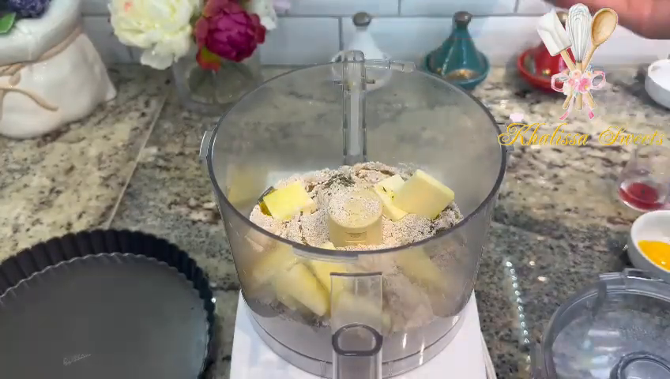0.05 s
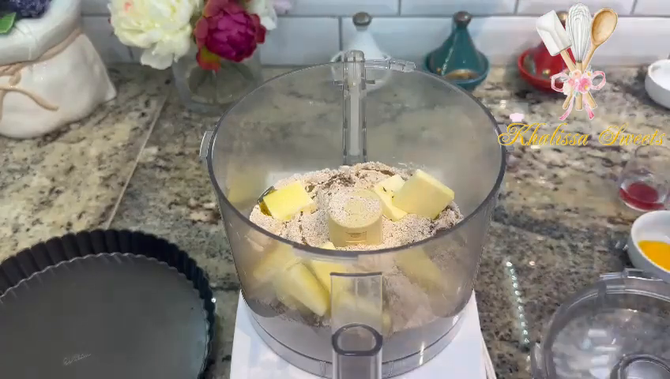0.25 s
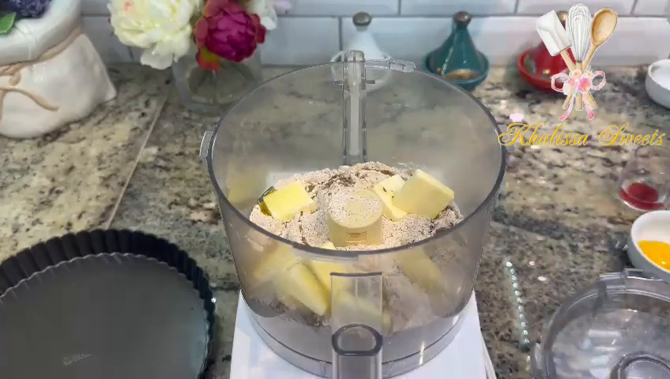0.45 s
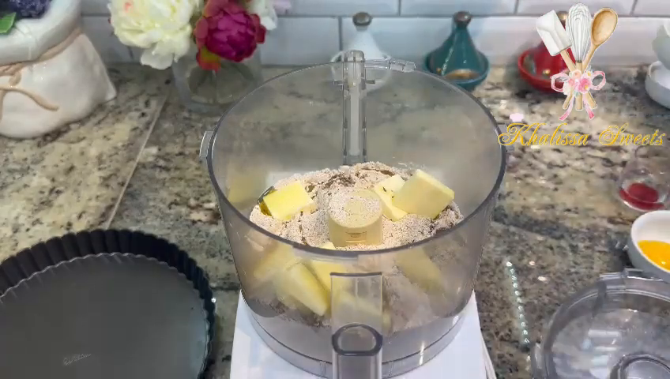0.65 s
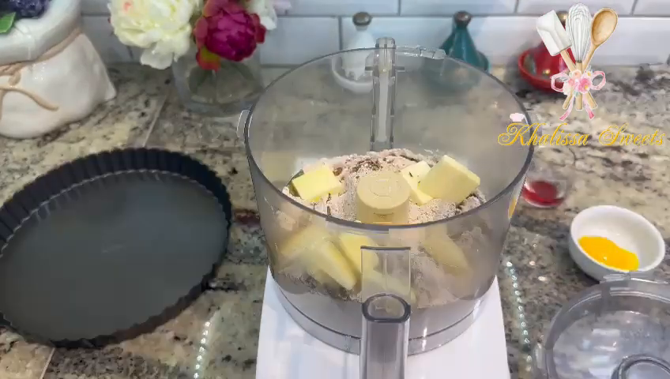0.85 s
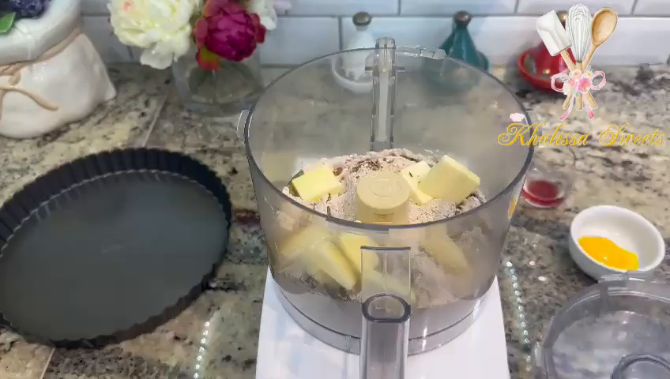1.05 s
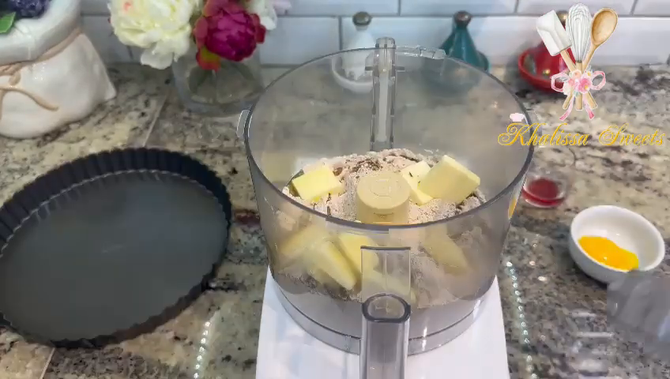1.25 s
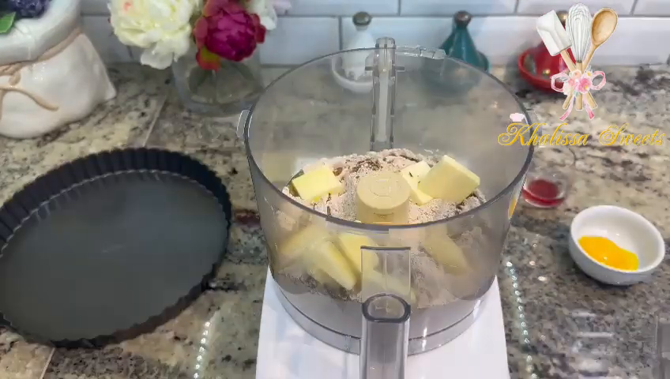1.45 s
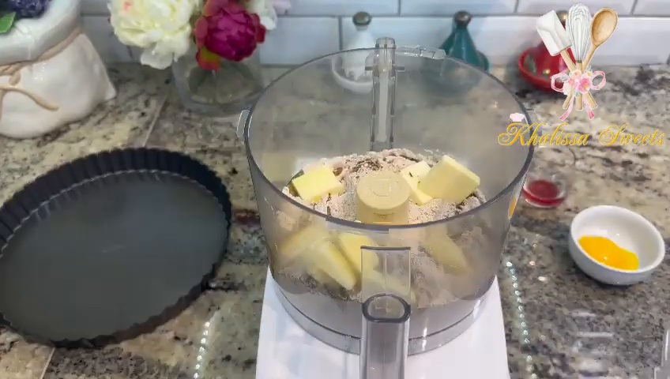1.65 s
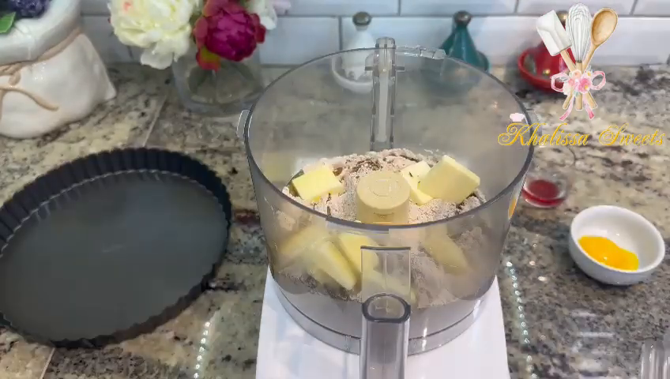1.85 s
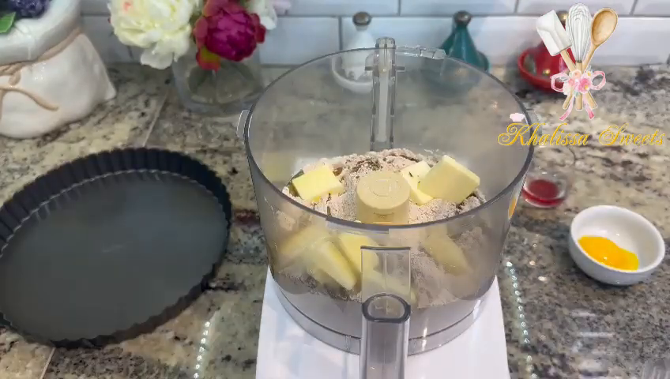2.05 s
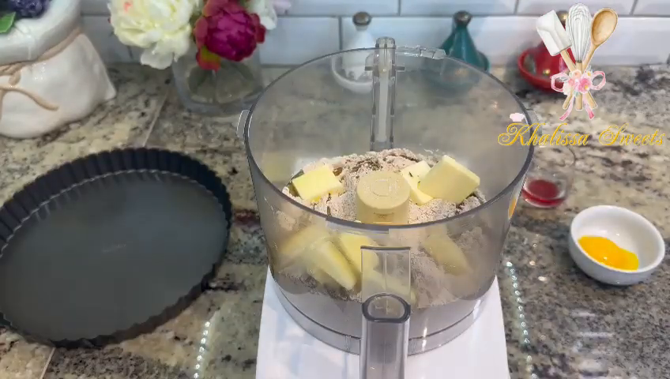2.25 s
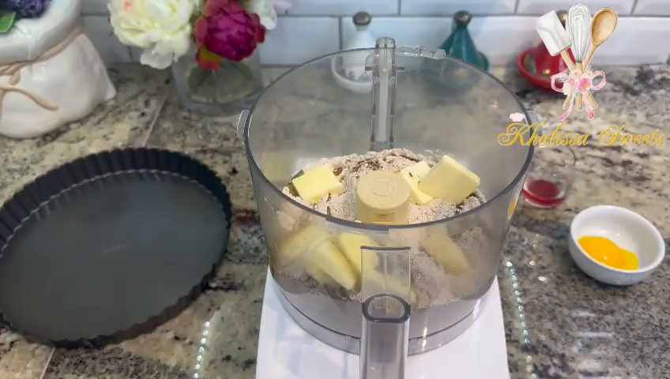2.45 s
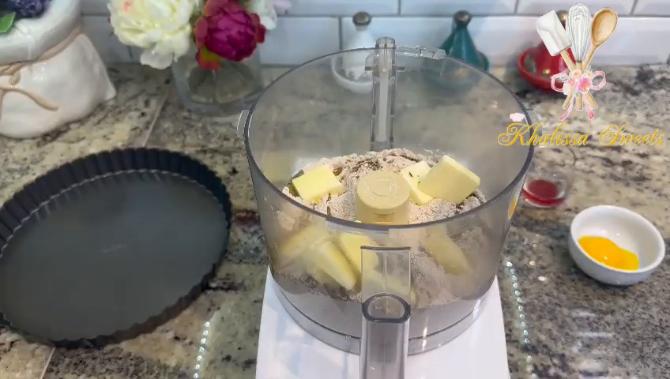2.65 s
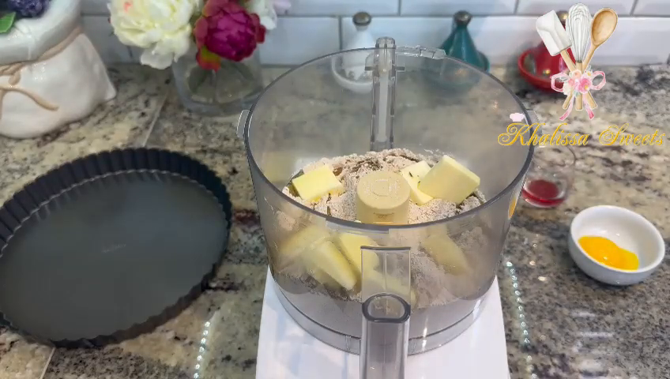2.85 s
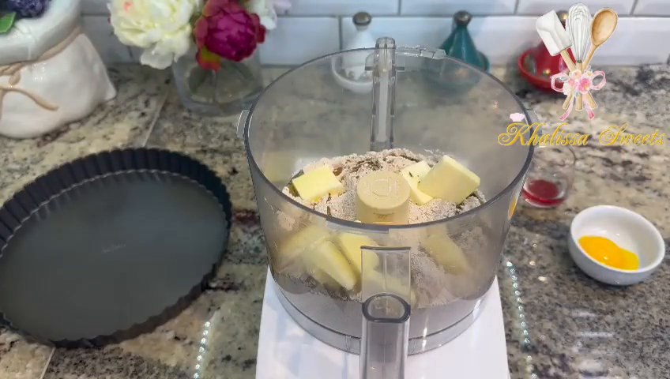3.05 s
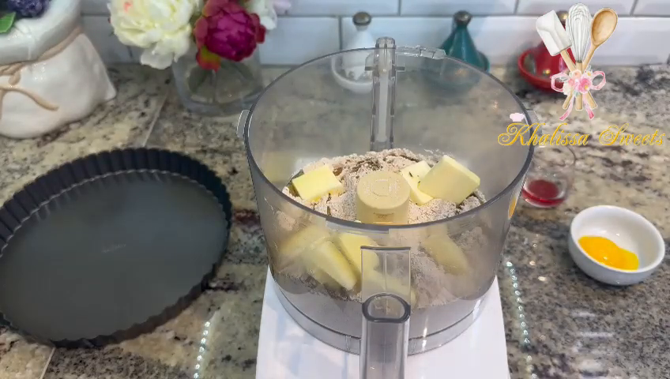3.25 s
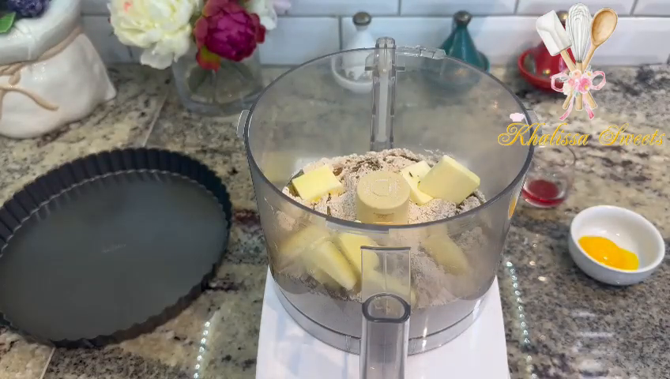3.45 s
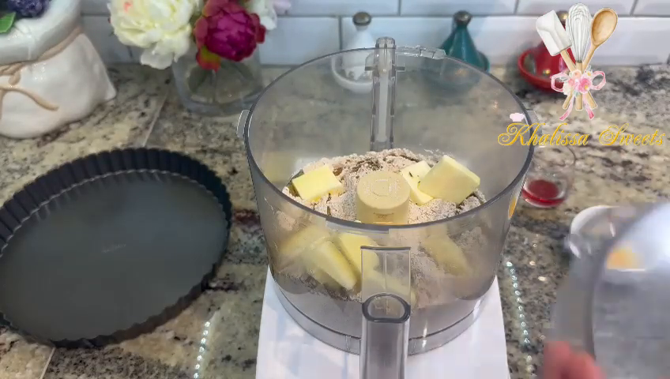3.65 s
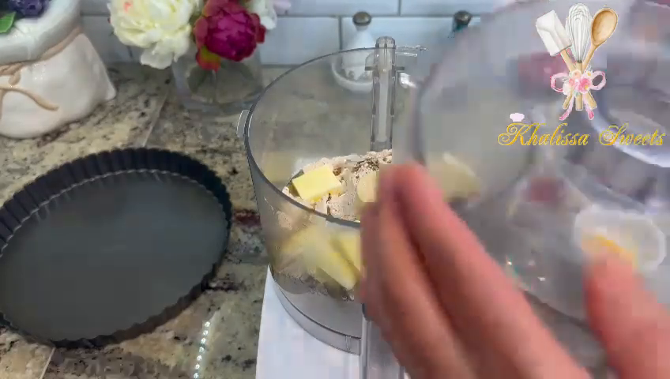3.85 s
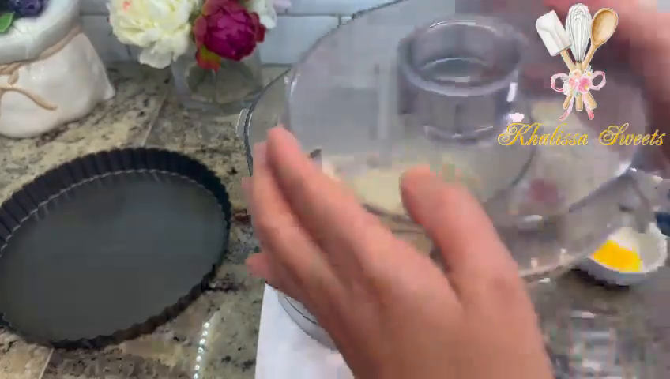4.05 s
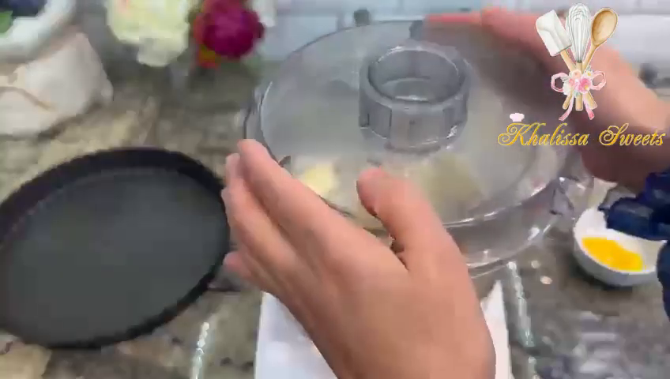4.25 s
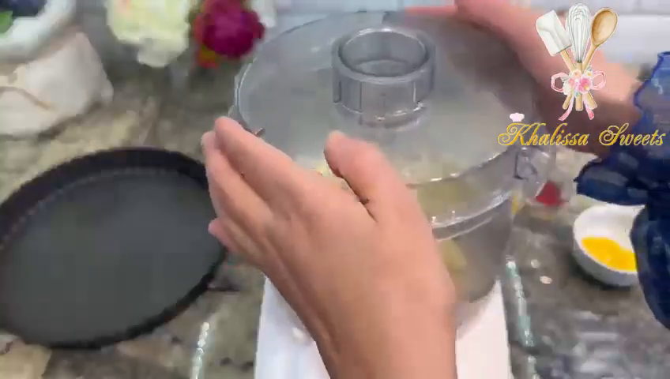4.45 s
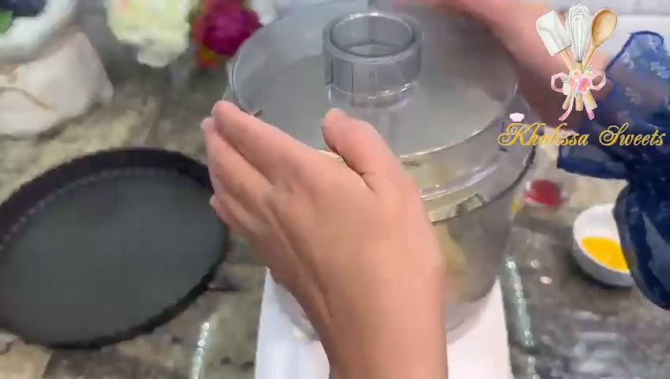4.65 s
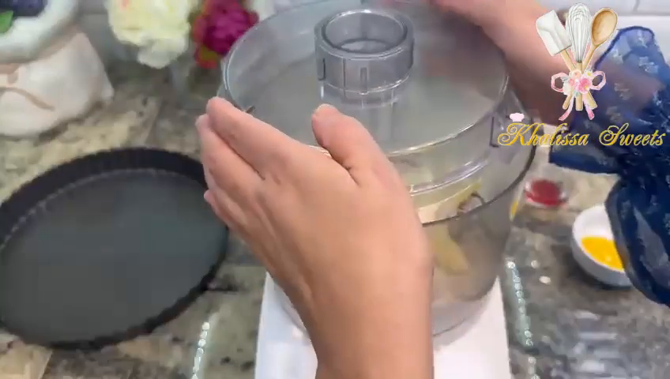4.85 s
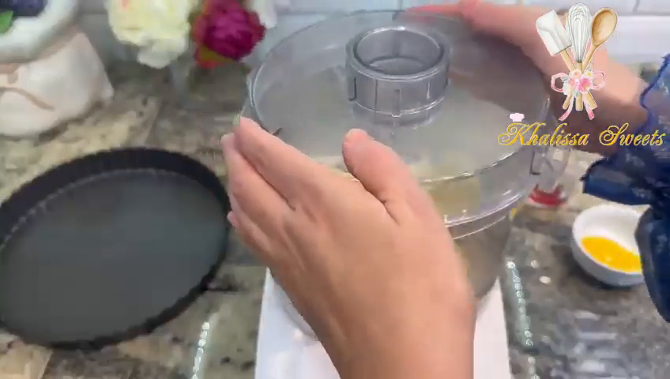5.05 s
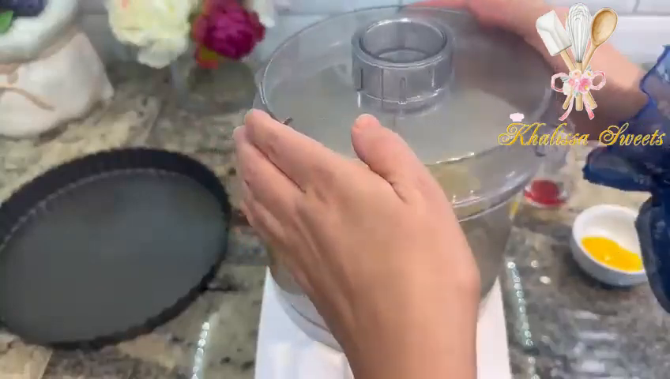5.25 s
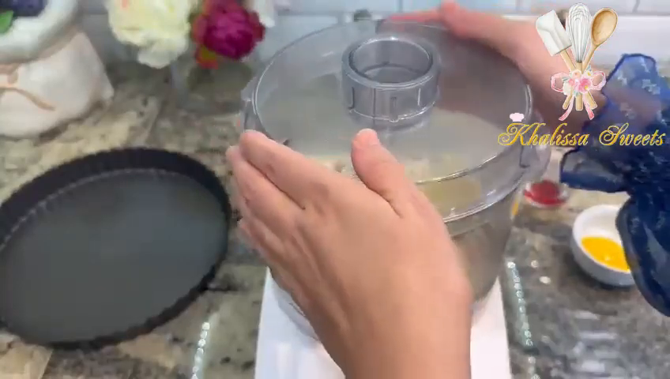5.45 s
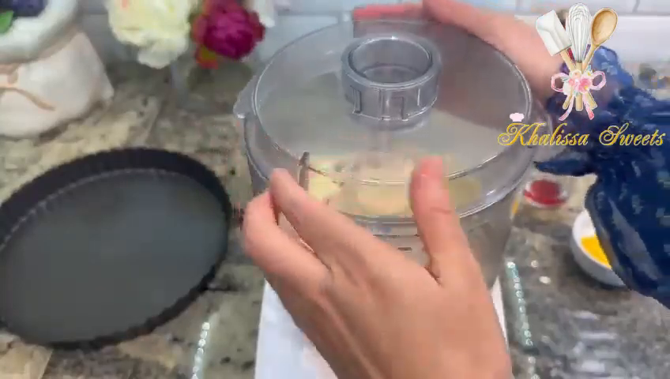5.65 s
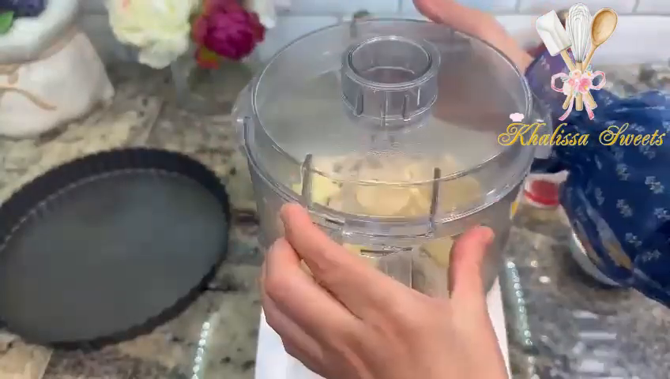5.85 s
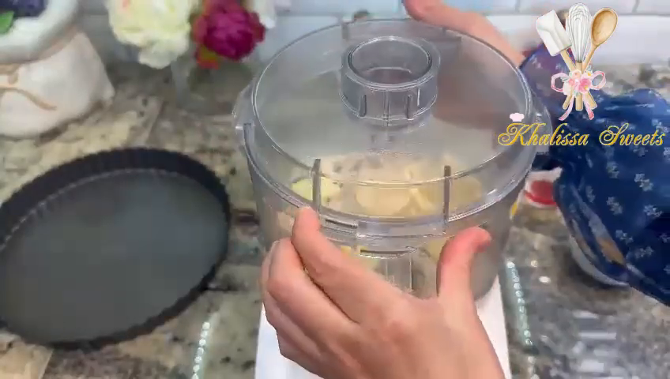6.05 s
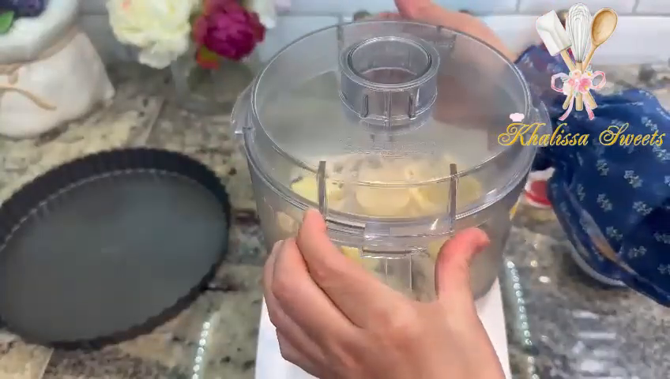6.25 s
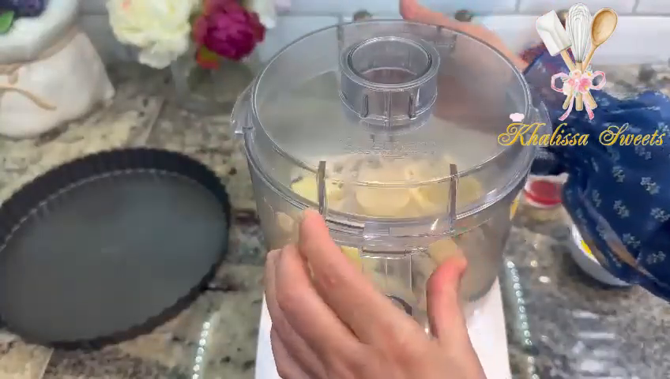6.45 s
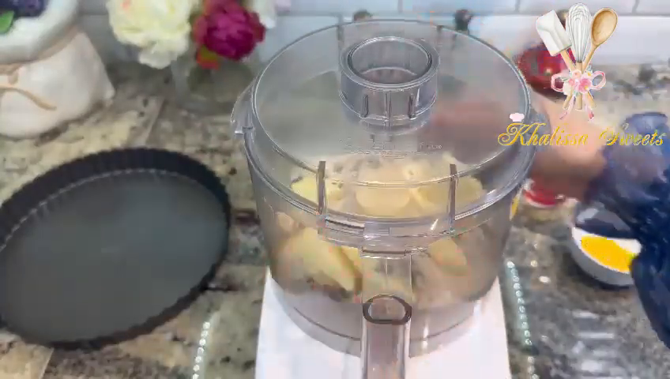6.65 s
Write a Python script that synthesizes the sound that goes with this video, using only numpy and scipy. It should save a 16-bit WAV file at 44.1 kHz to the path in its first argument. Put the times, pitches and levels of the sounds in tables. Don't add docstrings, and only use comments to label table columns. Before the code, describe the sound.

Over quiet kitchen hum, a thin plastic lid lifts from a stone counter with damped taps while sleeves and fingers rustle. After a near-quiet pause it clacks onto a plastic bowl with a hollow boom, scrapes and creaks by stick-slip, then snaps in a tight cluster. A lighter bright click leads into a hard locking clunk and small settling knocks. Close stereo pickup, short tiled-room reflections.

```python
import sys
import numpy as np
from scipy import signal
from scipy.fft import rfft, irfft
from scipy.io import wavfile
from scipy.ndimage import uniform_filter1d

SR = 44100
rng = np.random.default_rng(int(sys.argv[2]) if len(sys.argv) > 2 else 0)


def invert_db(x):
    u = np.asarray(x, float) / 20
    return 10 ** u


def master_out(mix):
    frames = np.transpose(np.atleast_2d(mix))
    ceiling = np.clip(frames, -1, 1)
    pcm = np.round(ceiling * 32767).astype(np.int16)
    wavfile.write(sys.argv[1], SR, pcm)


N = 295955

# pitch_hz, level_db (per Hz)
WALL_MODES = [(350, -27), (600, -9.5), (720, -7.5), (850, -7.5), (1600, -10), (2200, -11.5), (2700, -16),
              (3100, -23), (5000, -67)]
# pitch_hz, level_db (per Hz)
RIM_MODES = [(1800, -17.5), (2600, -5), (3400, -1.5), (4500, -7), (5200, -9), (6600, -10.5), (7150, -15),
             (9000, -12), (10200, -20), (12000, -28)]
# time_s, pitch_hz
GAP_PITCH = [(4.2, 492), (4.4, 437), (4.6, 330), (4.75, 370), (5.0, 340), (5.2, 393), (5.4, 320),
             (5.75, 241), (6.71, 290)]
HELD_PAN_DB, BOWL_PAN_DB, AIR_PAN_DB = -9, -2, -1.5
HELD_CUT, BOWL_CUT = 0.33, 0.09


def evened(x):
    return x / np.sqrt(np.mean(x ** 2) + 1e-20)


def read(points, hz):
    f, value = np.transpose(points)
    return np.interp(np.log(hz + 1), np.log(f + 1), value)


def add(mix, start_s, sound, pan_db, lag=8.):
    for side, heard, sign in zip(mix, sound * np.ones((2, 1)), (1, -1)):
        first = round(start_s * SR + sign * (lag - pan_db) / 2)
        part = side[first:][:len(heard)]
        part += invert_db(sign * pan_db / 2) * heard[:len(part)]


def resonate(x, hz, width_hz):
    turn = np.exp(2j * np.pi * np.cumsum(hz * np.ones(len(x))) / SR)
    pole = np.exp(-np.pi * width_hz / SR)
    return 2 * (turn * signal.lfilter([1 - pole], [1, -pole], x / turn)).real


def ring(x, modes):
    t = np.arange(6000) / SR
    response = sum(invert_db(db - 60 * t / t60) * np.sin(2 * np.pi * hz * t) for hz, db, t60 in modes)
    return signal.oaconvolve(x, response)


def dense(colour, t60, shared, blow=(1,)):
    both, left, right = rng.standard_normal((3, 4096))
    mixed = np.array([left, right]) * np.sqrt(1 - shared ** 2) + shared * both
    shaped = irfft(rfft(mixed) * invert_db(read(colour, np.fft.rfftfreq(4096, 1 / SR))))
    t = np.arange(4096) / SR
    decay = invert_db(-60 * t / t60) * (1 - np.exp(-t / 0.00014))
    first_instant = 1 + 3.5 * np.exp(-t / 0.0095)
    energy = np.convolve(np.square(blow), (decay * first_instant) ** 2)
    return evened(shaped) * np.sqrt(energy[:4096])


def hiss(colour, same, patchy_db, size):
    hop = size // 4
    frames, hz = N // hop + 5, np.fft.rfftfreq(size, 1 / SR)
    a, b, c, d, patches = rng.standard_normal((frames, len(hz), 5)).T
    patches = uniform_filter1d(patches, size // 64, 0)
    patches = evened(uniform_filter1d(patches, 4096 // hop, 1))
    same = np.clip(read(same, hz), -1, 1)[:, None]
    left = a + 1j * b
    right = same * left + np.sqrt(1 - same ** 2) * (c + 1j * d)
    z = np.array([left, right]) * invert_db(read(colour, hz)[:, None] + patchy_db * patches)
    return evened(signal.istft(z, nperseg=size, noverlap=size - hop)[1][:, :N])


def slips(count, per_s, spread_db):
    size = invert_db(spread_db * np.minimum(rng.exponential(1, count), 4))
    return size * rng.choice([-1, 1], count) * (rng.random(count) < per_s / SR)


def stroke(t, full_s, held_s, db, rise_db_per_s, fall_db_per_s):
    before_s = np.maximum(full_s - t, 0)
    after_s = np.maximum(t - full_s - held_s, 0)
    return invert_db(db - rise_db_per_s * before_s - fall_db_per_s * after_s)


def hum():
    # pitch_hz, level_db (per Hz)
    air_colour = [(12, -45), (20, -6.5), (49, 0.5), (135, -17.5), (191, -11.5), (213, -13), (455, -16.5),
                  (500, -25), (1200, -31), (1370, -25), (1740, -32.5), (2210, -36), (2660, -36.5),
                  (9270, -44), (11500, -50.5), (14900, -84), (22000, -120)]
    # pitch_hz, likeness
    air_same = [(60, 0.92), (170, 0.37), (480, 0.083), (1370, -0.21), (3880, 0.22), (11000, -0.22)]
    # pitch_hz, width_hz, level_db
    drone_bands = [(41, 22.6, -69.5), (60.1, 13, -75.5), (193.5, 24, -78)]
    # time_s, level_db
    whine_level = [(0, -82.5), (.9, -80.5), (1.3, -108), (6.71, -104.5)]

    def fuzzy(hz, width_1_hz, width_2_hz):
        noise = rng.standard_normal(N)
        return evened(resonate(resonate(noise, hz, width_1_hz), hz, width_2_hz))

    whine = [fuzzy(1370, 220, 300) for _ in range(2)]
    whine_db = np.interp(np.arange(N) / SR, *np.transpose(whine_level))
    drones = sum(invert_db(db) * fuzzy(hz, width, width) for hz, width, db in drone_bands)
    air = invert_db(-64) * hiss(air_colour, air_same, patchy_db=2.1, size=2048)
    return air + drones + invert_db(whine_db) * whine


def rustle():
    # full_s, held_s, rustle_db, dull_share_db, brightest_hz
    moves = [(1.05, 0.096, -75.5, 6, 4360), (1.275, 0.14, -77.5, 4, 5250), (1.5, 0.094, -88, 10, 4100),
             (1.59, .11, -76, 1.5, 4700), (1.74, 0.1, -79, -1.5, 4300), (1.95, 0.53, -77.5, 3.5, 4070),
             (2.13, 0.074, -81, 2, 4600), (2.29, 0.013, -76, -12, 3870), (2.37, 0.088, -74, 5.5, 3960),
             (2.57, 0.18, -68.5, 3, 4200), (2.85, 0.017, -81, -3, 4170), (2.95, 0.24, -89, 5, 4260),
             (3.12, 0.36, -93.5, 5, 4340), (3.27, 0.033, -92.5, 12, 4300), (3.56, 0.07, -75, -2, 4150),
             (3.61, 0.087, -77.5, 9.5, 3800), (3.77, 0.73, -88, 7, 4040)]
    # full_s, level_db
    hold_shifts = [(1.14, -57), (1.39, -68), (1.66, -72), (2.02, -68), (2.15, -75), (2.593, -58),
                   (2.72, -64), (2.9, -66), (3.15, -65.5), (3.27, -69), (3.361, -71.5), (3.45, -73),
                   (3.62, -68), (3.92, -68.5), (4.08, -62.5)]
    # pitch_hz, level_db (per Hz)
    rub_colour = [(290, -57), (500, -3.5), (682, -8), (1100, -2.5), (2200, -1), (2940, -7), (3200, -13),
                  (4160, -53), (7040, -120)]
    weave_colour = [(1760, -8.5), (3000, -8), (3250, -6), (3990, -5), (5110, -8.5), (5880, -6.5),
                    (6760, -9.5), (9060, -1), (10200, -8), (11700, -15), (14900, -72), (22000, -120)]
    thump_colour = [(20, -20), (45, 6.5), (90, 0.5), (200, 2), (450, -1), (700, -10), (950, -37.5)]
    stir_db_per_s, settle_db_per_s, thump_db_per_s, thump_rest_db = 426, 317.5, 161, -82.5
    t = np.arange(N) / SR
    bright, dull = sum(stroke(t, s, held, db, stir_db_per_s, settle_db_per_s) * invert_db([[0], [dull_db]])
                       for s, held, db, dull_db, _ in moves)
    brightest_hz = np.interp(t, *np.transpose(moves)[::4])
    shift = sum(stroke(t, s, 0, db, thump_db_per_s, thump_db_per_s) for s, db in hold_shifts)
    first_s = moves[0][0]
    shift += stroke(t, first_s, GAP_PITCH[0][0] - first_s, thump_rest_db, stir_db_per_s, settle_db_per_s)
    catch = invert_db(1.17 * evened(uniform_filter1d(rng.standard_normal(N), 300)))

    apart = [(200, 0.84), (500, 0.08), (1500, 0.1)]  # pitch_hz, left-right likeness
    rub = hiss(rub_colour, apart, patchy_db=4.0, size=512)
    weave = hiss(weave_colour, apart, patchy_db=2.5, size=512)
    weave = evened(weave + 2.35 * np.array([resonate(side, brightest_hz, 1500) for side in weave]))
    whisk = stroke(t, 1.296, 0.073, 3.3, stir_db_per_s, settle_db_per_s)
    weave = weave + whisk * np.array([resonate(side, 5400, 830) for side in weave])
    thump = hiss(thump_colour, [(40, 0.43)] + apart, patchy_db=3.5, size=1024)
    layers = invert_db(3.0) * dull * rub + invert_db(6) * bright * weave + shift * thump
    return layers * catch * invert_db([[-1.5], [1.5]])


def contacts(mix, rows, lasts_s, cut, pan_db):
    # pitch_hz, level_db, t60_s
    lasting = [(1030, -5, 0.09), (1173, -15.5, 0.056), (1380, -14, 0.17), (1665, -7.5, 0.09),
               (2100, -24.5, 0.12)]
    # pitch_hz, level_db, t60_s
    clear_modes = [(2020, 1, .05), (2740, 6, 0.039), (3390, 8.5, 0.042), (3900, -6, 0.039),
                   (4540, 0, 0.087), (5710, -7, 0.044), (6550, -13.5, .04), (6916, -12.5, .03),
                   (8580, -18, .03)]
    clear_db, clear_vary_db = -15, 2.5
    t = np.arange(1500) / SR
    for s, db, hz, treble_db in rows:
        u = t / lasts_s
        blow = slips(count=len(t), per_s=7800, spread_db=2.5) * u * np.exp(1 - u)
        blow[0] = 6 * np.exp(-lasts_s / 0.002)

        wall = dense(WALL_MODES, t60=0.042, shared=0.5, blow=blow)
        wall += 2.9 * np.array([resonate(side, hz, 290) for side in wall])
        wall += ring(blow, lasting + [(hz, 6, .016)])[:4096]
        wall = signal.lfilter(*signal.butter(2, cut * hz, "high", fs=SR), wall)

        rim = dense(RIM_MODES, t60=0.0087, shared=0.54, blow=blow)
        rim[:, :len(t)] += 0.23 * np.diff(blow, prepend=0)
        varied = [(f, d + clear_vary_db * rng.standard_normal(), t60) for f, d, t60 in clear_modes]
        clear = ring(blow, varied)[:4096]
        rim = rim / abs(rim).max() + invert_db(clear_db) * clear / abs(clear).max()

        sound = wall / abs(wall).max() + invert_db(treble_db + 7.0) * rim / abs(rim).max()
        add(mix, s, invert_db(db + 1.5) * sound, pan_db)


def held_taps(mix):
    # start_s, peak_db, ring_hz (strongest), treble_db
    tap_rows = [(1.044, -49, 1530, -25), (1.099, -37.5, 1210, -49), (1.108, -42, 1180, -44),
                (1.128, -46.5, 930, -18.5), (1.16, -63, 1160, -18), (1.283, -56.5, 1080, -39),
                (1.309, -56.5, 1030, -24), (2.562, -57, 1600, -12), (2.584, -52, 1280, -20),
                (2.726, -49, 1350, -21), (3.555, -57, 2300, -24), (3.592, -45, 830, -27)]
    contacts(mix, tap_rows, lasts_s=0.0026, cut=HELD_CUT, pan_db=HELD_PAN_DB)


def single_rings(mix):
    # start_s, peak_db, pitch_hz, t60_s
    ring_rows = [(1.045, -43, 1470, .03), (1.102, -44.5, 1160, 0.1), (4.229, -19, 1600, .09),
                 (4.23, -27, 2150, 0.07), (4.231, -31, 2500, .08), (4.243, -30, 1850, .07),
                 (4.288, -38, 1605, .06), (4.317, -32, 1560, .13), (4.96, -40.5, 840, 0.049),
                 (5.386, -42, 4040, .05), (5.424, -45, 3650, .1), (5.466, -39, 3800, .04),
                 (5.661, -45.5, 2030, 0.025), (5.683, -45, 1510, .03), (6.05, -32, 2000, 0.034),
                 (6.05, -39, 4620, .1), (6.145, -25, 1380, 0.054), (6.144, -22, 1830, .06),
                 (6.145, -24, 2150, .07), (6.155, -38, 1373, .18), (6.051, -41, 6300, .05),
                 (6.148, -38, 2500, .1), (6.148, -20.5, 320, 0.075), (6.147, -32, 590, .03),
                 (6.14, -33, 2720, 0.027), (6.05, -36, 875, 0.02), (6.05, -39, 2206, .03),
                 (4.231, -30.5, 1030, 0.061), (4.245, -33, 1236, .14), (4.316, -36.5, 2100, 0.026),
                 (1.125, -48, 1167, .3), (1.14, -53, 1400, .25), (1.046, -51, 2100, .03),
                 (3.591, -48, 850, .05), (2.562, -58, 1600, .04), (5.247, -46, 1450, .03),
                 (5.367, -36, 2700, .03), (5.385, -35, 2500, .04), (5.465, -32, 2600, .04),
                 (5.948, -56, 2000, .03), (4.959, -42, 1500, .04), (1.127, -49.5, 883, 0.062),
                 (1.127, -47.5, 1465, 0.046), (1.283, -63, 1050, 0.13), (4.965, -50, 2210, 0.19),
                 (5.075, -48, 2170, 0.065), (5.337, -39, 2100, .04), (5.384, -34, 1520, 0.12),
                 (5.465, -31, 1224, 0.059), (5.415, -34.5, 1428, 0.041)]
    spread, swell_s = .045, .001
    t = np.arange(9000) / SR
    for (s, db, hz, t60), draw in zip(ring_rows, rng.standard_normal((len(ring_rows), 3, 5))):
        bunch = np.sin(2 * np.pi * hz * (1 + spread * draw[0][:, None]) * t)
        sides = invert_db(3.0 * draw[1:]) @ bunch / 3
        add(mix, s, invert_db(db - 60 * t / t60) * np.minimum(t / swell_s, 1) * sides, pan_db=-2.5)


def crunches(mix):
    # start_s, peak_db, ring_hz (strongest), treble_db
    crunch_rows = [
        (1.096, -39.5, 1030, -38),
        (4.263, -39, 1610, -16),
        (5.35, -51, 1540, -11),
        (5.377, -28, 2230, -12.5),
        (5.436, -34.5, 1380, -27),
        (6.138, -25, 1800, -6),
    ]
    contacts(mix, crunch_rows, lasts_s=0.0038, cut=BOWL_CUT, pan_db=BOWL_PAN_DB)


def thuds(mix):
    # start_s, peak_db, pitch_hz
    thud_rows = [(1.119, -44.5, 116), (4.231, -37.5, 95), (4.319, -32, 71), (4.36, -31, 53.4),
                 (5.373, -32, 118), (5.42, -36, 89), (5.466, -25, 94), (5.679, -55, 87), (5.741, -46, 70.6),
                 (6.149, -34, 124), (6.461, -45, 81), (4.24, -37, 40), (5.36, -37.5, 42), (5.43, -33, 58),
                 (5.5, -39, 40), (5.76, -45, 45), (6.15, -27, 45)]
    t = np.arange(9000) / SR
    for s, db, hz in thud_rows:
        gain = invert_db(db - 60 * t / 0.12) * (1 - np.exp(-t / 0.0072))
        add(mix, s, gain * np.sin(2 * np.pi * hz * t), -.3, lag=.17 * SR / hz)


def swells(mix, rows, swell_s, pan_db):
    t = np.arange(9000) / SR
    rise = np.sin(np.pi / 2 * np.clip(t / swell_s, 0, 1)) ** 2
    for s, db, hz, t60 in rows:
        fall = invert_db(-60 * (np.maximum(t - swell_s, 0) / max(t60, .005)) ** 1.235)
        add(mix, s, invert_db(db - 1.0) * rise * fall * np.sin(2 * np.pi * hz * t), pan_db, lag=1.7)


def moans(mix):
    # start_s, peak_db, pitch_hz, t60_s
    moan_rows = [
        (4.233, -30.5, 215, 0.072),
        (4.3132, -15.5, 470, 0.013),
        (5.315, -34.5, 368, 0.12),
        (5.328, -38.5, 362, 0.072),
        (2.72, -59, 698, 0.067),
        (6.424, -41.5, 176, 0.064),
        (6.551, -47.5, 146, 0.074),
    ]
    swells(mix, moan_rows, swell_s=0.01, pan_db=-1.5)


def booms(mix):
    # start_s, peak_db, pitch_hz, t60_s
    boom_rows = [(4.228, -17, 520, 0.019), (4.24, -15.5, 514, 0.0041), (4.343, -32, 438, 0.037),
                 (4.387, -39.5, 445, 0.038), (4.408, -36, 438, 0.078), (4.436, -41, 438, 0.058),
                 (4.452, -42, 440, 0.053), (4.486, -38, 452, 0.024), (4.514, -30, 399, 0.027),
                 (4.577, -36.5, 316, 0.12), (4.687, -38, 408, 0.068), (4.731, -35, 360, 0.043),
                 (4.763, -41.5, 382, 0.069), (4.939, -39.5, 373, 0.082), (4.964, -29.5, 371, 0.059),
                 (5.05, -38.5, 336, 0.14), (5.052, -38, 554, 0.075), (5.09, -43, 520, 0.036),
                 (5.2, -46, 397, 0.16), (5.235, -46, 382, 0.068), (5.66, -47, 570, 0.028),
                 (5.682, -35.5, 466, 0.02), (5.162, -38, 432, 0.03), (5.17, -31.5, 425, 0.011),
                 (5.334, -27, 344.8, 0.19), (5.366, -20, 310, 0.045), (5.389, -21.5, 507, 0.015),
                 (5.416, -20, 283, 0.0047), (5.462, -22, 577, 0.011), (5.477, -28.5, 335, 0.019),
                 (6.143, -17, 440, 0.0042), (6.407, -43.5, 392, 0.033)]
    swells(mix, boom_rows, swell_s=0.004, pan_db=AIR_PAN_DB)


def snaps(mix):
    # start_s, peak_db, ring_hz (strongest), treble_db
    snap_rows = [
        (4.229, -18, 1700, -19),
        (5.366, -26.5, 1230, -12),
        (5.384, -30, 1510, -6.5),
        (5.415, -19.5, 1290, -24),
        (5.464, -18, 1250, -18.5),
        (6.05, -29.5, 2100, -1.5),
        (6.146, -15.5, 1390, -12),
    ]
    contacts(mix, snap_rows, lasts_s=0.00064, cut=BOWL_CUT, pan_db=BOWL_PAN_DB)


def rim_clicks(mix):
    # start_s, peak_db, ring_hz (strongest), treble_db
    click_rows = [(4.242, -22.5, 1030, -27), (4.314, -25, 1560, -25), (4.937, -42, 1300, -29),
                  (4.960, -44, 860, -37), (5.036, -33.5, 835, -33), (5.056, -35, 815, -14),
                  (5.088, -48, 834, -21), (5.131, -51, 990, -17), (5.246, -41.5, 1430, -25.5),
                  (5.265, -47.5, 2080, -20), (5.339, -33.5, 1880, -13), (5.385, -27.5, 1530, -28),
                  (5.475, -31, 1310, -16), (5.659, -35, 1510, -21.5), (5.663, -36.5, 1980, -14),
                  (5.68, -33, 830, -26), (5.744, -47, 1460, -16), (5.948, -54.5, 1920, -6),
                  (6.049, -37, 970, -9), (6.143, -20, 1440, -16.5), (6.401, -43.5, 765, -16),
                  (6.447, -49, 1370, -17), (6.535, -43, 1340, -14)]
    contacts(mix, click_rows, lasts_s=0.0014, cut=BOWL_CUT, pan_db=BOWL_PAN_DB)


def slides(mix):
    # grip_s, held_s, force_db, seal_db (air shut in), speed_db (grit)
    strokes = [(4.29, 0.4, -53.5, 2.5, -8.5), (4.719, 0.048, -69, 15, -13), (4.973, 0.087, -47, 2.5, -9.5),
               (5.112, 0.28, -58, 2, -7), (5.347, 0.12, -43.5, 2.5, -10.5), (5.581, 0.1, -61, -10, -12.5),
               (5.697, 0.058, -62, 10, -2), (5.921, 0.39, -73, 3, -9.5), (6.065, 0.084, -65.5, -4.5, 11.5),
               (6.177, 0.016, -48.5, 5.5, -9.5), (6.4, 0.064, -67.5, 8.5, -8),
               (6.53, 0.029, -66.5, 6.5, -1.5), (6.601, 0.114, -74, -4, -5)]
    # pitch_hz, level_db, t60_s
    shell_modes = [(63, -6, 0.19), (118, -4, 0.069), (220, 10, 0.053), (562, -5, 0.11)]
    grip_db_per_s, ease_db_per_s = 404, 191
    start = 4 * SR
    t = np.arange(start, N) / SR
    gap_hz = np.interp(t, *np.transpose(GAP_PITCH))
    rasp, boom, fizz = sum(stroke(t, s, held, db, grip_db_per_s, ease_db_per_s) * invert_db([[0], [seal_db], [speed_db]])
                           for s, held, db, seal_db, speed_db in strokes)
    coarse = slips(count=len(t), per_s=500, spread_db=2.0)
    air = resonate(resonate(coarse, gap_hz, 200), gap_hz, 440)
    shell = invert_db(-2.5) * evened(ring(coarse, shell_modes)[:len(t)])
    wall = grit = 0
    for spot in range(8):
        fine = slips(count=len(t), per_s=550, spread_db=1.0)[None]
        fine *= np.sin(np.pi * (t * rng.uniform(2.5, 5.8) + rng.random())) ** 3
        wall_modes = dense(WALL_MODES, t60=0.046, shared=0.31)
        wall = wall + signal.oaconvolve(fine, wall_modes, axes=1)[:, :len(t)]
        rim_modes = dense(RIM_MODES, t60=0.037, shared=0.4)
        grit = grit + signal.oaconvolve(fine, rim_modes, axes=1)[:, :len(t)]
    sound = boom * (evened(air) + shell) + rasp * evened(wall) + fizz * evened(grit)
    add(mix, start / SR, sound * (t > GAP_PITCH[0][0]), pan_db=-2.0)


def knocks(mix):
    # start_s, peak_db, pitch_hz, t60_s
    knock_rows = [(5.018, -34, 199, 0.031), (5.421, -20.5, 213, 0.03), (5.466, -19, 237, 0.015),
                  (5.682, -32, 200, 0.032), (5.738, -35.5, 158, 0.075), (5.749, -33, 159, 0.022),
                  (5.768, -44.5, 157, 0.069), (6.054, -41.5, 188, 0.051), (6.1433, -20.5, 200, 0.023),
                  (6.149, -11.5, 207, 0.031), (6.168, -28.5, 221, 0.13), (6.356, -45, 202, 0.029),
                  (6.455, -40.5, 162, 0.068)]
    swells(mix, knock_rows, swell_s=0.0032, pan_db=-0.5)


def kitchen(mix, early_db=-6.5, late_db=-6.0):
    # pitch_hz, t60_s
    room_t60 = [(100, 0.48), (300, 0.073), (1000, 0.37), (4000, 0.35), (10000, 0.15)]
    echoes = np.zeros((3, 2, SR // 2))
    at = np.arange(300, SR // 2 - 20, 20) + rng.integers(0, 20, (3, 2, (SR // 2 - 301) // 20))
    np.put_along_axis(echoes, at, rng.choice([-1., 1.], at.shape), 2)
    hz, t, z = signal.stft(echoes, SR, nperseg=256)
    tails = signal.istft(z * invert_db(-60 * t / read(room_t60, hz)[:, None]), SR, nperseg=256)[1]
    tails *= invert_db(late_db) / np.linalg.norm(tails[0, 0])
    near = rng.integers(20, 500, (3, 2, 7))
    np.put_along_axis(tails, near, invert_db(early_db - near / 60.) * rng.choice([-1., 1.], near.shape), 2)

    thin = signal.lfilter(*signal.butter(2, 420, "high", fs=SR), mix.mean(0))
    turn = 2 * np.pi * 23 * np.arange(N) / SR
    wet = 0
    for k, tail in enumerate(tails):
        share = np.sqrt(2 / 3) * np.cos(turn + k * np.pi / 3)
        wet = wet + signal.fftconvolve((thin * share)[None], tail, axes=1)[:, :N]
    return mix + wet


def scene():
    lid = np.zeros((2, N))
    for source in (held_taps, single_rings, crunches, thuds, moans, booms, snaps, rim_clicks, slides, knocks):
        source(lid)
    return kitchen(lid) + rustle() + hum()


def top_cut(x):
    return signal.sosfilt(signal.butter(12, 11610, fs=SR, output="sos"), x)


def record(dry):
    mid_side = np.array([dry[0] + dry[1], dry[0] - dry[1]]) / 2
    hz, t, z = signal.stft(mid_side, SR, nperseg=1024, noverlap=768)
    column_hz = hz[:, None]
    power = uniform_filter1d(uniform_filter1d(abs(z) ** 2, size=4, axis=1), size=6, axis=2) + 1e-20
    dip_db = 10 * np.log10(power / uniform_filter1d(power, size=31, axis=1))
    cut_db = -16 * np.clip((-dip_db - 2.0) / .7, 0, 1) * (column_hz > 2400)
    slow = uniform_filter1d(uniform_filter1d(power, size=2, axis=1), size=8, axis=2)
    slow_db = 10 * np.log10(slow)
    valley_db = slow_db - uniform_filter1d(slow_db, size=13, axis=1)
    cut_db -= 14 * np.clip((-valley_db - 2.0) / .8, 0, 1) * (column_hz > 560)

    treble_db = 10 * np.log10((abs(z[:, hz > 7000]) ** 2).sum((0, 1)) + 1e-20)
    attack = np.clip((treble_db - np.roll(treble_db, 3) - 6) / 3, 0, 1)
    cut_db *= 1 - .6 * np.clip((treble_db + 74.0) / 12., 0, 1) * (column_hz < 4600)
    cut_db *= 1 - np.maximum(attack, np.roll(attack, 2))

    attack = np.roll(attack * np.clip((treble_db + 58.5) / 4., 0, 1), -1)
    gate_db = np.clip((column_hz - 10150) / 48.0, 0, 30.) * np.array([1, 0])[:, None, None]
    top_db = np.clip((column_hz - 10300) / 200.0, 0, 12.) * np.array([1, .25])[:, None, None]
    bass_db = np.clip(36 - column_hz, 0, 20) * 0.6
    cut_db -= (1 - attack) * gate_db + top_db + bass_db

    mid, side = signal.istft(z * invert_db(cut_db), SR, nperseg=1024, noverlap=768)[1][:, :N]
    stereo = signal.lfilter(*signal.butter(2, 30, "high", fs=SR), [mid + side, mid - side])
    edge = signal.firwin(101, 12200, window=("kaiser", 7), fs=SR)
    return top_cut(signal.oaconvolve(stereo, edge[None], "same"))


dry = scene()
out = record(dry)
master_out(out)
```